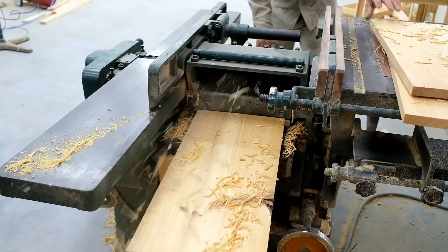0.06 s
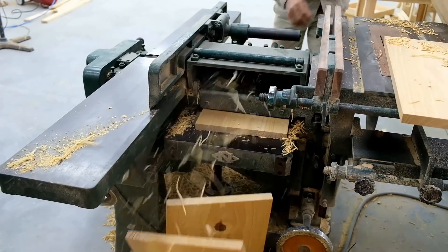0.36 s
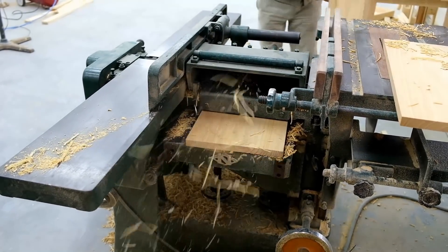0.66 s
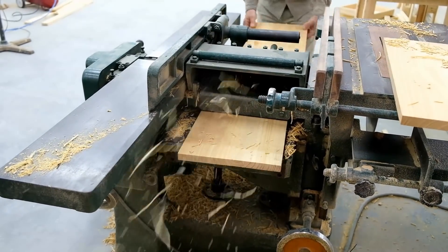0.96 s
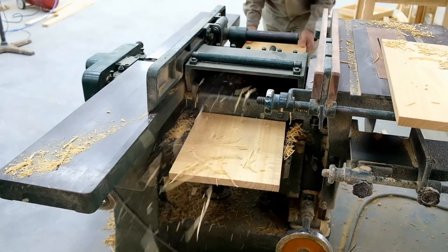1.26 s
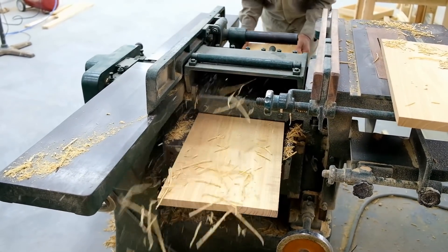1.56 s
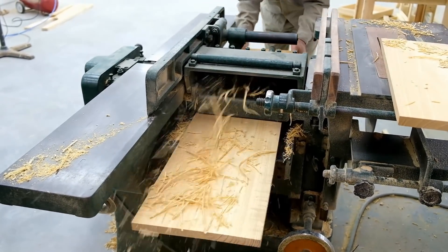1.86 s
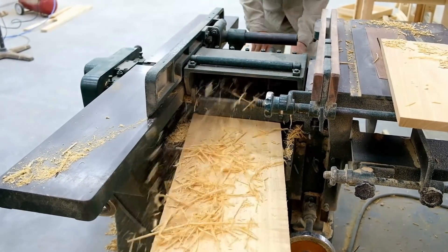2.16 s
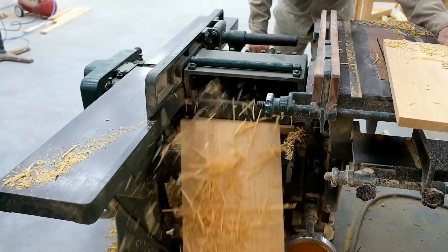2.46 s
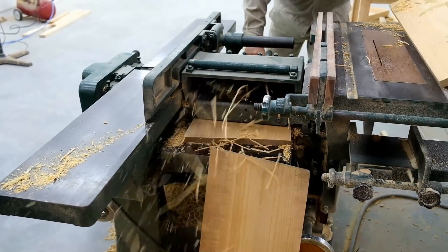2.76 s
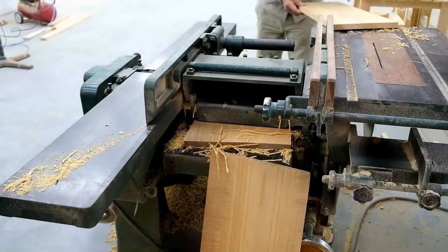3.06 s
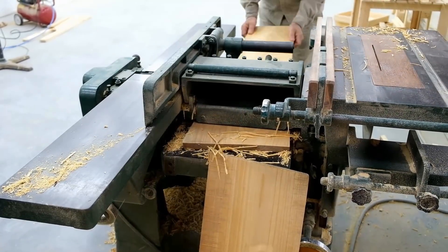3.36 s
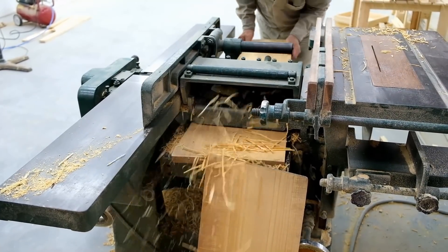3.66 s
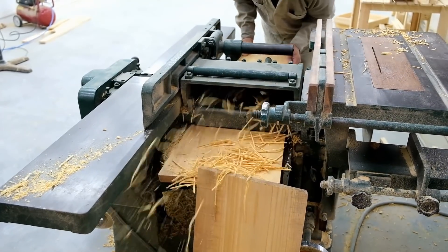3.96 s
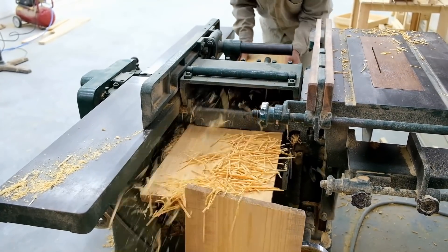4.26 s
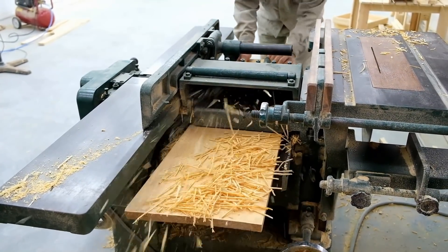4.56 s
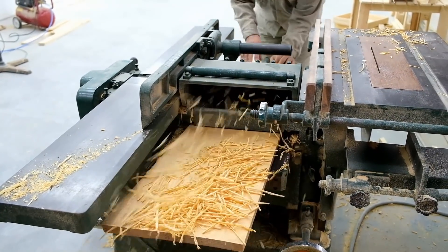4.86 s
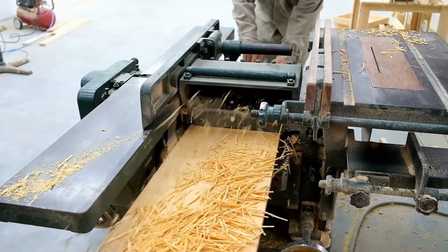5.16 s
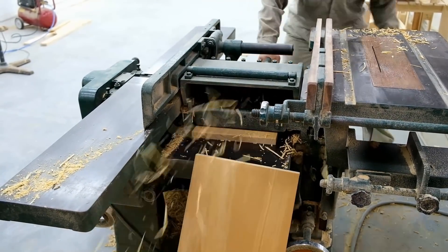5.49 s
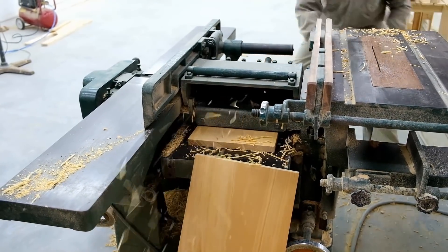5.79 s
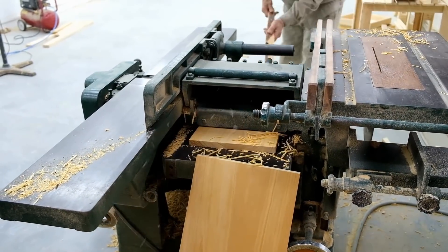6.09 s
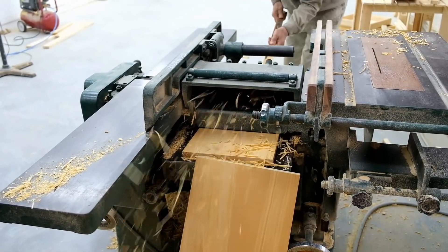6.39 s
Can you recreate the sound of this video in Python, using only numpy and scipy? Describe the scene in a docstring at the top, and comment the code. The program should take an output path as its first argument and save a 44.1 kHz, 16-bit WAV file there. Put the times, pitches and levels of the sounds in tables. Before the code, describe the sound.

Close by, a wood planer hums and cuts boards with a buzzing whine and harsh hiss, broken by a few sharp wooden knocks.

```python
"""A thickness planer is already cutting a board, its knives snapping about 190 times a second.
The snaps make a whine and a rasp, the wood rings and squeals, and early on boards knock on the iron.
More boards follow, with short gaps near 1.6 s and 3.2 s; a few flying chips hit the microphone.
Near 5.5 s a splinter cracks with a loud knock, and after one more gap the next cut begins at 6.3 s.
All the way through, the spinning cutter block hums and throws out a rush of air."""
import sys
import numpy as np
from scipy import signal
from scipy.fft import rfft, irfft, next_fast_len
from scipy.io import wavfile
from scipy.ndimage import uniform_filter1d, map_coordinates

SR = 44100
rng = np.random.default_rng(int(sys.argv[2]) if len(sys.argv) > 2 else 0)


def put_to_file(sound):
    """Save the sound as 16-bit audio at rate SR, in the file named by the first command-line argument."""
    columns = np.atleast_2d(sound).T  # one column per channel
    safe = np.clip(columns, -1, 1)
    whole_steps = np.round(safe * 32767)
    wavfile.write(sys.argv[1], SR, whole_steps.astype(np.int16))


N = 283563

# how fast the cutter block spins: (time [s], turns per second [Hz])
BLOCK_SPEED = [(0, 191.9), (.3, 191.9), (.85, 190.9), (1.4, 191.5), (1.78, 191.5), (1.88, 189.6),
               (2.25, 189.6), (2.45, 189.5), (2.63, 190.3), (2.72, 189.6), (2.9, 189.5), (3.02, 192),
               (3.55, 192.1), (3.62, 189.6), (4.45, 190), (4.62, 190.6), (4.75, 193), (4.86, 190.2),
               (5.36, 190.1), (5.52, 191), (5.85, 190.5), (5.99, 192.4), (6.32, 191.8), (6.43, 190.2)]
# how hard the knives snap: (time [s], relative level [dB])
SNAP_LEVEL = [(0.0, -29), (1.1, -29), (1.38, -29), (1.82, -29.5), (2.43, -30), (2.7, -31.5), (3.53, -29),
              (3.56, -32.3), (3.84, -34), (4.07, -31), (4.31, -35), (4.47, -28.5), (4.61, -32), (5.35, -29),
              (5.84, -35), (5.9, -29), (6.27, -28), (6.43, -34.4)]
# the wood's ringing note moves as the board travels: (time [s], pitch [Hz])
WOOD_PITCH = [(0, 5440), (.16, 5100), (.38, 5600), (.55, 4870), (.74, 5500), (1.2, 5050), (1.48, 5600),
              (1.72, 5470), (1.87, 5170), (2.08, 5520), (2.7, 5750), (2.92, 4997), (3.5, 5120),
              (3.64, 5880), (3.98, 5120), (4.15, 5487), (4.44, 5010), (4.55, 5280), (4.8, 5389),
              (5.43, 5800), (5.7, 5524), (5.84, 4853), (6.28, 4907), (6.43, 5700)]
RISE_S, FALL_S = 0.022, 0.0078  # brief level changes climb more slowly than they drop


def whine(turn, load, casing_db):
    """Fast knife snaps blend into a whine that changes with the cut; the casing sings along."""
    # overtones at cut depths 0, 0.5 and 1: (multiple of the turn rate, relative level [dB])
    free_tones = [(5, -14), (6, -12), (7, 4), (8, 16), (9, -1), (10, -9), (11, -3.5), (12, 8.5), (13, 7),
                  (14, 10.5), (15, 1.5), (16, 7.5), (17, 7), (18, 3), (19, -4.5), (20, -4), (21, 5.5),
                  (22, -10), (23, 5.5), (24, 2.5), (25, -14), (26, -4), (27, 5), (28, -28)]
    light_tones = [(5, -19), (6, 21.5), (7, -2.5), (8, -24.5), (9, -4), (10, -4), (11, 4.5), (12, -32.5),
                   (13, -4.5), (14, -1.5), (15, 0.5), (16, 0.5), (17, -3), (18, 4), (19, 1.5), (20, 0.5),
                   (21, 2.5), (22, 4.5), (23, 3), (24, 0.5), (25, -4)]
    deep_tones = [(5, -17.5), (6, -15.5), (7, -8), (8, 9), (9, -9), (10, -16), (11, -1.5), (12, 8.5),
                  (13, -11), (14, 1), (15, -6.5), (16, 0), (17, -4), (18, 1), (19, -9), (20, -5),
                  (21, -8.5), (22, -28.5), (23, -1), (24, -2), (25, -6.5), (26, -6)]
    # the board squeals: (start [s], end [s], share of the snaps [0-1])
    squeals = [(-.1, 3.1, 0.2), (4.33, 4.95, 0.42), (5.22, 5.42, 0.5), (5.5, 5.76, .17)]
    rate_hz = np.mean(np.transpose(BLOCK_SPEED)[1])
    singing = [6, 8, 12]  # these overtones come from the casing instead of the knives
    knife = snaps(turn, scatter_db=.7, jitter_s=2e-6)
    knife = filtered(knife, lambda hz: ~np.isin(np.round(hz / rate_hz), singing))
    def voice(tones):
        bass = [(200, -72), (600, -19.5)]  # (pitch [Hz], level [dB])
        treble = [(5900, -23), (6400, -19), (7300, -27.5), (15000, -44)]
        return coloured(knife, bass + [(k * rate_hz, db) for k, db in tones] + treble)
    free, deep = np.clip(1 - 2 * load, 0, 1), np.clip(2 * load - 1, 0, 1)
    buzz = amp(3.5) * free * voice(free_tones)
    buzz += amp(1.06) * (1 - free - deep) * voice(light_tones)
    buzz += amp(1.4) * deep * voice(deep_tones)
    squeal_colour = [(1200, -37.5), (2400, -14.5), (2850, -.5), (3050, 0), (3500, -9.5), (7000, -50.5)]
    share = np.clip(sum(part * hold(start, end, .12, .12) for start, end, part in squeals), 0, 1)
    buzz = (1 - share) * buzz + amp(3.5) * share * coloured(knife, squeal_colour)
    buzz = buzz.std() * patchy(buzz, depth_db=1.3, size=(4, 70))
    casing = sum(amp(db + 1.7 * wobble(25) + 1.66 * wobble(5.01)) * unit(np.cos(2 * np.pi * k * turn))
                 for k, db in zip(singing, casing_db))
    return amp(curve(SNAP_LEVEL) + 1.3) * buzz + casing


def wood_ring(turn, age, load):
    """Each knife pass makes the wood ring with a tiny ping, a little different every time."""
    # how strongly the wood rings: (time [s], relative level [dB])
    ring_level = [(0.0, -39), (0.12, -46), (0.35, -32.5), (1.44, -30), (1.53, -53), (1.67, -33.5),
                  (2.52, -43), (2.68, -28), (2.8, -37.5), (3.48, -37), (3.74, -27.5), (4.4, -29.5),
                  (4.47, -39), (4.74, -26), (4.95, -45), (5.17, -35.5), (5.26, -40), (5.69, -31.5),
                  (6.13, -42), (6.43, -34.5)]
    # the wood chatters under the knife and rings louder: (start [s], end [s], boost [dB])
    chatters = [(0.368, 0.405, 3.5), (1.699, 1.755, 10), (4.544, 4.8, 6)]
    ping_s = .0014
    count = turn.astype(int)
    size, detune = rng.standard_normal((count[-1] + 1, 2))[count].T
    progress = np.clip(age / ping_s, 0, 1) ** 0.56
    envelope = amp((.6 + .9 * load) * size) * np.sin(np.pi * progress) ** 2
    pitch_hz = curve(WOOD_PITCH) * (1 + (0.0059 + 0.01 * load) * detune)
    pings = unit(envelope * np.sin(2 * np.pi * pitch_hz * age))
    chatter_db = sum(db * hold(start, end, RISE_S, FALL_S) for start, end, db in chatters)
    return amp(curve(ring_level) + chatter_db + 0.26) * pings


def tearing(turn, age, load):
    """Each snap has a sharp edge, with a spray of breaking wood fibres behind it."""
    # how strongly the fibres tear: (time [s], relative level [dB])
    tear_level = [(0.0, -38.5), (0.28, -35), (1.07, -40), (1.67, -37.5), (1.79, -30), (1.84, -36.5),
                  (2.91, -34.9), (2.96, -41), (3.48, -38), (3.55, -36), (4.49, -37.5), (4.63, -30.5),
                  (5.26, -36), (5.36, -33.5), (5.83, -35.5), (5.94, -41), (6.28, -39.5), (6.43, -32.5)]
    # their bright hiss: (frequency [Hz], relative level [dB])
    fibre_colour = [(3000, -40), (5500, -9), (6700, 2), (7400, 1), (8300, -2), (9500, -1), (11000, -2.8),
                    (13000, -4.5), (15500, -9)]
    edge = unit(snaps(turn, scatter_db=1.1, jitter_s=3e-6))
    edge = coloured(edge + amp(-2) * echoes(edge, t60=.011), fibre_colour)
    spray = coloured(bursts(age, life_s=0.00043, rest=0.21), fibre_colour)
    hiss = patchy(edge + amp(-4 + 2 * load) * spray, depth_db=2.7, size=(8, 26))
    return amp(curve(tear_level) + 0.76) * unit(rebound(hiss, strength=.04 + .2 * load))


def rasp(age, load):
    """Every pass scrapes off a shaving: a burst of noise, louder in a deeper cut."""
    # the scrape: (frequency [Hz], relative level [dB])
    scrape_colour = [(500, -23.5), (1200, -7), (2800, 4), (4200, -12), (6000, -5.5), (8000, -28),
                     (15000, -22)]
    scrape = coloured(bursts(age, life_s=.0014, rest=.12), scrape_colour)
    return amp(curve(SNAP_LEVEL) - 21 + 12.3 * load ** 2) * scrape


def rebound(x, strength):
    """The knife strikes again two ring cycles later, so the tone colour glides with the wood's pitch."""
    earlier = np.arange(N) - 2 * SR / curve(WOOD_PITCH)
    return (x + strength * map_coordinates(x, [earlier])) / np.sqrt(1 + strength ** 2)


def between_tables(x, direct):
    """Each snap rattles between the planer's iron tables without changing its tone colour."""
    # echoes between the tables: (delay [s])
    delays = [.00117, .00163, .00229]
    def response(hz):
        trips = np.exp(-2j * np.pi * np.outer(delays, hz))
        return np.prod((direct + trips) / (1 + direct * trips), axis=0)
    return filtered(x, response)


def feed():
    """As the knives enter and leave each board, the cut depth and its levels slide to new values."""
    # cuts, with relative levels: (start [s], end [s], depth [0-1], air rush [dB], draught [dB],
    # siren [dB], casing overtone 6 [dB], overtone 8 [dB], overtone 12 [dB])
    cuts = [(-.1, 0.65, 0.69, -49, -57.5, -50.5, -50.5, -45, -38),
            (0.655, 1.435, 0.67, -54, -60.5, -52.5, -48, -44.5, -43),
            (1.774, 2.61, 0.91, -48.5, -59.5, -51, -42, -50, -37),
            (2.63, 2.93, 0.83, -47, -66, -52, -45, -47, -39.5),
            (3.558, 4.551, 0.9, -49.5, -61.5, -50.5, -43, -53, -37),
            (4.58, 4.818, 0.36, -48.5, -78, -56, -45, -43, -42),
            (4.808, 5.622, 0.87, -48, -62, -49.5, -44, -45.5, -38.5),
            (5.636, 5.89, .7, -50.5, -69, -51.5, -50, -47.5, -40.5),
            (6.333, 6.599, 0.9, -49.5, -66, -50.5, -46, -64, -37.5)]
    # between boards: the same columns without start and end
    idle = (0.49, -51.5, -75, -54, -49.5, -36.5, -37.5)
    bite_s, run_out_s = 0.11, 0.1
    changes = sum(np.outer(np.subtract(row, idle), hold(start, end, bite_s, run_out_s))
                  for start, end, *row in cuts)
    return np.array(idle)[:, None] + changes


def swell():
    """Everything but the knocks and the low draught briefly jumps up or dips together."""
    # jumps and dips: (start [s], end [s], level change [dB])
    swells = [(-0.02, 0.04, 5), (0.068, 0.111, 5), (0.15, 0.31, 5), (0.302, 0.34, -4.5), (0.367, 0.404, 4),
              (0.44, 0.5, 2), (0.525, 0.597, 3.5), (0.647, 0.69, -4), (0.715, 0.761, 5.5),
              (1.594, 1.628, 4), (1.708, 1.73, 3), (1.732, 1.779, -7.6), (1.812, 1.895, 4),
              (1.936, 2.305, 4.5), (2.357, 2.425, 5), (2.434, 2.483, 3.5), (2.504, 2.592, 4.3),
              (2.928, 3.063, 6), (3.362, 3.395, 3), (3.422, 3.59, 4), (3.641, 3.673, 2.5),
              (3.866, 3.88, 4.5), (3.949, 3.985, 2.5), (4.262, 4.29, 5), (4.804, 4.829, -5),
              (4.865, 4.925, 3.5), (4.994, 5.071, 5), (5.262, 5.302, 4), (5.333, 5.368, 3),
              (5.433, 5.467, 4.5), (5.521, 5.575, 4.5), (5.58, 5.617, 5.5), (5.834, 5.89, 6),
              (5.963, 5.989, 3.5), (6.369, 6.45, 5)]
    return amp(sum(db * (hold(start, end, RISE_S, FALL_S) if db > 0 else hold(start, end, FALL_S, RISE_S))
                   for start, end, db in swells))


def impacts():
    """Boards knock on the iron and on each other, splinters crack and chips thud on the microphone."""
    # a board's own notes: (pitch [Hz], width [Hz], relative level [dB])
    board_notes = [(654, 67, -2), (834, 19, 2), (1085, 28, -1), (1315, 60, -3.5), (1635, 290, -4.5),
                   (1830, 87, -3.5), (2205, 91, -3.5), (3120, 600, -13)]
    # knocks: (time [s], relative level [dB], pitch of the blow [Hz], time to fade by 60 dB [s])
    knocks = [(0.321, -20, 1530, 0.14), (0.61, -16, 1870, 0.14), (.639, -15, 1910, 0.11),
              (.646, -25, 1650, 0.58), (1.018, -38, 690, 0.11), (2.583, -16.5, 1500, 0.095),
              (2.592, -21, 931, 0.067), (4.761, -28, 835, 0.1), (4.799, -25.5, 1418, 0.16),
              (5.467, -11.5, 1500, 0.062), (5.474, -26.5, 682, 0.26), (5.554, -17.5, 1599, 0.094)]
    # splinters snapping off: (time [s], peak level [dB])
    splinters = [(.303, -5.5), (0.64, -4.5), (2.582, -8), (2.586, -16), (5.467, -9.5)]
    # chips landing: (time [s], relative level [dB])
    chips = [(.724, -35), (1.055, -38), (1.8, -36), (1.890, -30), (1.959, -37), (1.979, -19.5),
             (2.341, -40), (3.552, -34), (4.236, -37), (5.147, -32.5)]
    out, t = np.zeros(N), np.arange(SR // 4) / SR
    hz = np.fft.rfftfreq(len(t), 1 / SR)
    wood = sum((-1) ** k * amp(db) * 1j * hz * width / (note ** 2 - hz ** 2 + 1j * hz * width)
               for k, (note, width, db) in enumerate(board_notes))
    for s, db, pitch_hz, t60 in knocks:
        contact = 1 / (1 + (np.log2((hz + 1) / pitch_hz) / 0.59) ** 2)
        ring = unit(irfft(rfft(rng.standard_normal(len(t))) * wood * contact, len(t)))
        add(out, s, amp(db - 5) * ring * (1 - np.exp(-t / .0015)) * amp(-60 * t / t60))
    crisp = signal.butter(2, [2000, 7000], "bandpass", fs=SR, output="sos")
    for s, db in splinters:
        crack = signal.sosfilt(crisp, rng.standard_normal(len(t)) * np.exp(-t / 0.0029))
        add(out, s, amp(db) * crack / np.abs(crack).max())
    decay = t / 0.00046
    thud = (1 - np.exp(-4 * decay)) * (1 - decay / 2) * np.exp(-decay)
    for s, db in chips:
        add(out, s, amp(db + 11.5) * thud)
    return out


def air(rush_db):
    """The block throws out air and shavings with a rushing noise."""
    # the rush: (frequency [Hz], relative level [dB])
    rush_colour = [(100, -20.5), (260, -9), (450, -4), (750, -0.5), (1700, 2.5), (3000, 4.5), (5500, 5),
                   (8000, -9.5), (15000, -15)]
    return amp(rush_db + 11) * patchy(coloured(rng.standard_normal(N), rush_colour), depth_db=3)


def siren(turn, level_db):
    """The two knives chop the air at the table edges into a hum; flying shavings make it flutter."""
    # the hum: (multiple of the turn rate, relative level [dB])
    hum_tones = [(1, -16.5), (2, 1.5), (4, -1.5)]
    hum = sum(amp(db + 1.2 * wobble(18) + 1.1 * wobble(70)) * np.sin(2 * np.pi * k * turn)
              for k, db in hum_tones)
    return amp(level_db) * unit(hum)


def draught(level_db):
    """Air from the block blows on the microphone in puffs."""
    # the low rumble: (frequency [Hz], relative level [dB])
    rumble_colour = [(15, -8), (40, 3), (75, -3), (130, -2.5), (220, -12), (500, -42), (1500, -70)]
    puffs = amp(7.5 * np.minimum(wobble(45), 1.4))
    return amp(level_db + 0.5) * unit(coloured(rng.standard_normal(N), rumble_colour) * puffs)


def echoes(x, t60):
    """A wash of echoes about as strong as x, fading by 60 dB in t60 seconds."""
    t = np.arange(1, SR // 3) / SR
    tail = rng.standard_normal(len(t)) * amp(-60 * t / t60)
    return signal.fftconvolve(x, tail / np.linalg.norm(tail))[:N]


def snaps(turn, scatter_db, jitter_s):
    """One click a turn, slightly uneven in size and timing."""
    at = np.interp(np.arange(1, int(turn[-1])), turn, np.arange(N))
    size, late = rng.standard_normal((len(at), 2)).T
    at = at + late * jitter_s * SR
    index = at.astype(int)[:, None] + np.arange(-7, 9)
    offset = index - at[:, None]
    shape = np.sinc(offset) * np.sinc(offset / 8)  # lets a click fall between samples
    return np.bincount(index.ravel(), (shape * amp(scatter_db * size)[:, None]).ravel(), N)[:N]


def bursts(age, life_s, rest):
    """Noise that flares at each knife pass and sinks towards a resting level."""
    return rng.standard_normal(N) * (np.exp(-age / life_s) + rest)


def amp(db):
    """Turn decibels into a volume factor."""
    return 10 ** (np.asarray(db) / 20)


def unit(x):
    """Scale x to an average strength (rms) of 1."""
    return x / np.sqrt(np.mean(x ** 2) + 1e-20)


def along(points, hz):
    """Read between (frequency, value) points, with octaves evenly spaced."""
    freqs, values = np.transpose(points)
    return np.interp(np.log(hz + 1), np.log(freqs + 1), values)


def curve(rows):
    """Join (time, value) rows into one value per sample."""
    return np.interp(np.arange(N) / SR, *np.transpose(rows))


def hold(start, end, attack_s, release_s):
    """Fade from 0 to 1 and back, passing halfway at start and at end."""
    t = np.arange(N) / SR
    return np.clip(np.minimum((t - start) / attack_s, (end - t) / release_s) + .5, 0, 1)


def wobble(rate):
    """A smooth curve through `rate` random points a second."""
    return map_coordinates(rng.standard_normal(int(N * rate / SR) + 4), [np.arange(N) * rate / SR])


def filtered(x, response):
    """Multiply each frequency in x by response(hz)."""
    length = 2 * next_fast_len(N // 2 + SR // 4)
    return irfft(rfft(x, length) * response(np.fft.rfftfreq(length, 1 / SR)), length)[..., :N]


def coloured(x, points):
    """Give x the tone colour of (Hz, dB) points, at strength 1; it rings only after each click."""
    def response(hz):
        cepstrum = irfft(np.log(amp(along(points, hz)) + 1e-6))
        half = len(cepstrum) // 2
        return np.exp(rfft(np.r_[cepstrum[0], 2 * cepstrum[1:half]], len(cepstrum)))
    return unit(filtered(x, response))


def patchy(x, depth_db, size=(8, 36)):
    """Let the tone colour drift in random patches; size is (frequency steps, time steps)."""
    spectra = signal.stft(x, nperseg=512)[2]
    drift = uniform_filter1d(rng.standard_normal(spectra.shape), size[0], 0)
    drift = uniform_filter1d(drift, size[1], 1)
    return unit(signal.istft(spectra * amp(depth_db * unit(drift)))[1][:N])


def add(track, s, sound):
    """Mix a sound into the track at s seconds."""
    part = track[round(s * SR):][:len(sound)]
    part += sound[:len(part)]


def scene():
    """The planer close by; shavings spray all round it and the workshop's echoes widen the treble."""
    # stereo width: (frequency [Hz], gain of the sound from the sides [dB])
    width = [(60, -14), (400, -9), (1100, -20), (2200, -32), (4000, -1.5), (8000, -3.5), (13000, -4)]
    turn = np.cumsum(curve(BLOCK_SPEED)) / SR  # turns made so far
    age = turn % 1 / curve(BLOCK_SPEED)  # seconds since the last knife pass
    depth, rush_db, draught_db, siren_db, *casing_db = feed()
    load, gain = np.clip(depth, 0, 1), swell()
    ring, knocks = wood_ring(turn, age, load), impacts()
    cut = ring + tearing(turn, age, load) + rasp(age, load)
    knives = rebound(whine(turn, load, casing_db), strength=0.02 * load) + cut
    machine = between_tables(knives, direct=0.95) + siren(turn, siren_db) + air(rush_db)
    machine += amp(-12) * echoes(cut, t60=0.15)
    mid = gain * machine + draught(draught_db) + knocks + amp(-9.5) * echoes(knocks, t60=.18)
    # fresh noise from the sides makes the sound wide
    around = tearing(turn, age, load) + amp(6.5) * rasp(age, load) + air(rush_db)
    around += amp(-8.5) * echoes(ring + knocks, t60=0.048)
    side = filtered(amp(-.5) * gain * around + draught(draught_db), lambda hz: amp(along(width, hz)))
    return np.array([mid - side, mid + side])


def record(dry):
    """Round off the loudest peaks and remove the very highest treble."""
    ceiling, top_hz = .68, 15900
    rounded = dry / (1 + (dry / ceiling) ** 4) ** .25
    return filtered(rounded, lambda hz: np.clip((top_hz - hz) / 100, 0, 1))


dry = scene()
out = record(dry)
put_to_file(out)
```